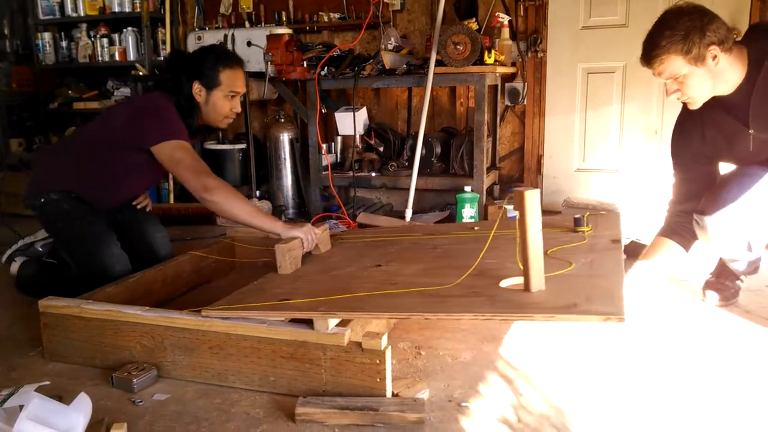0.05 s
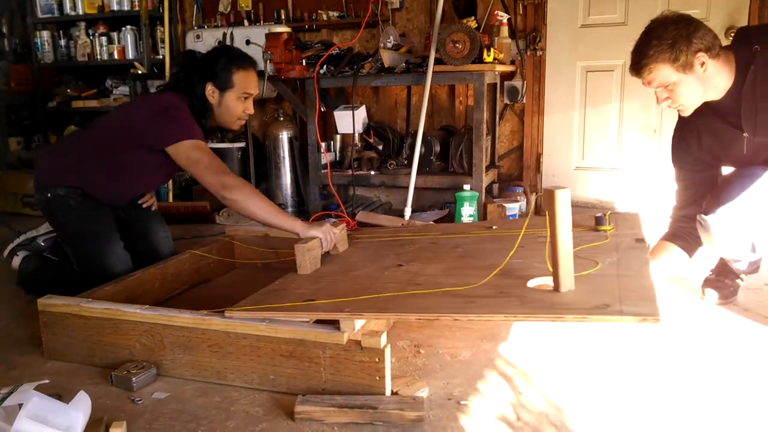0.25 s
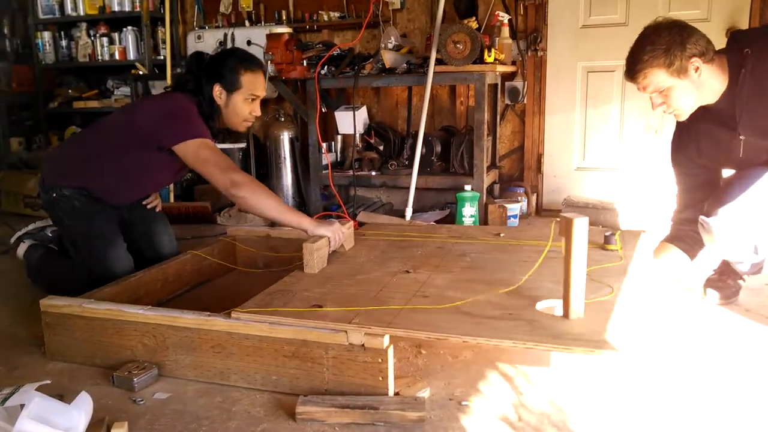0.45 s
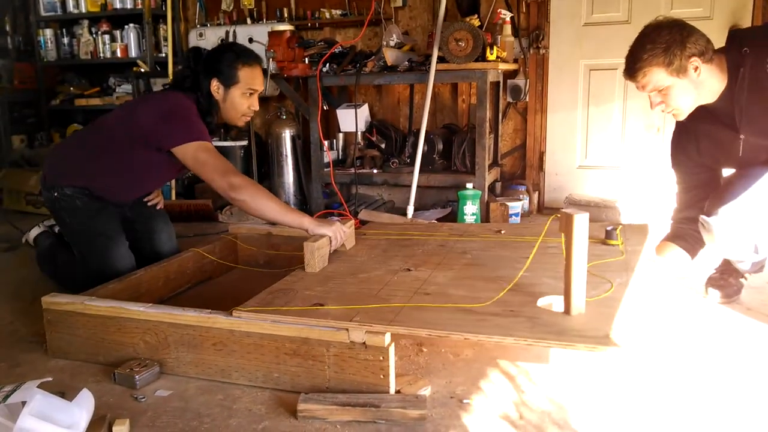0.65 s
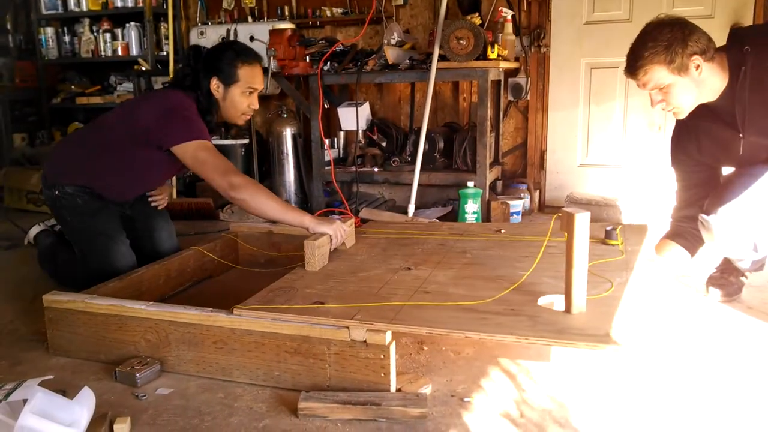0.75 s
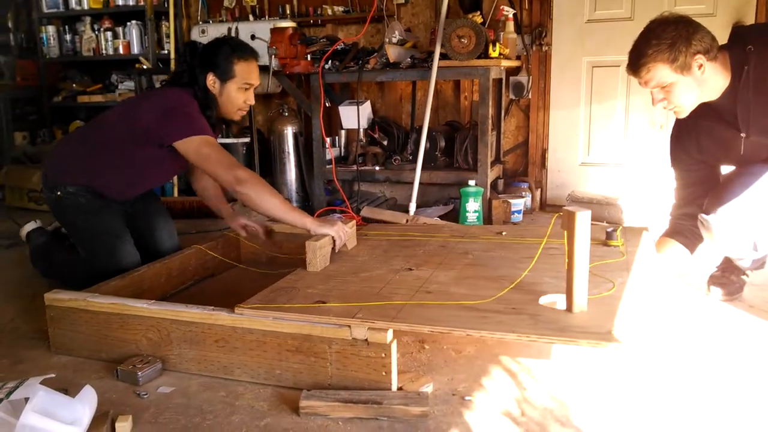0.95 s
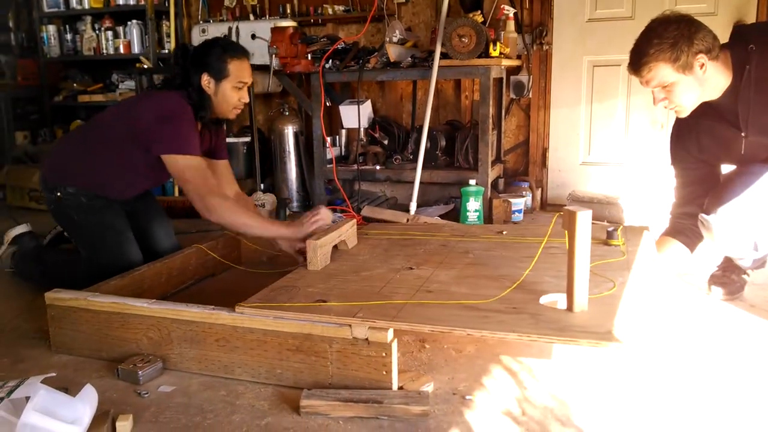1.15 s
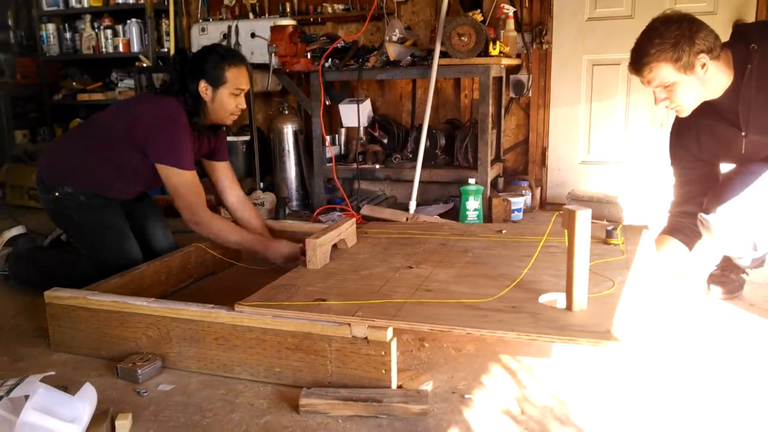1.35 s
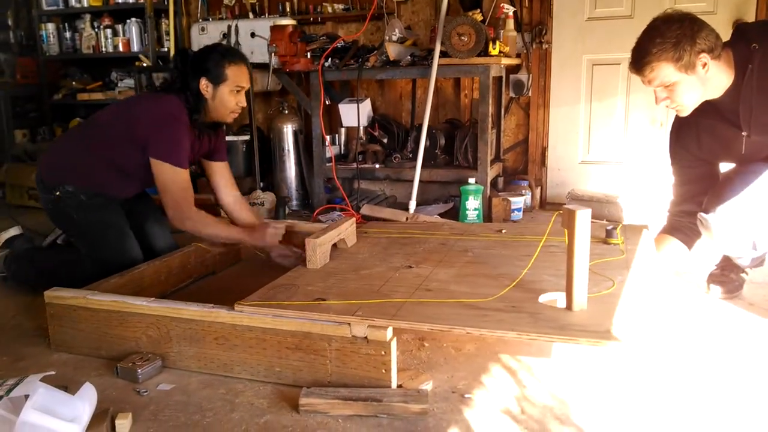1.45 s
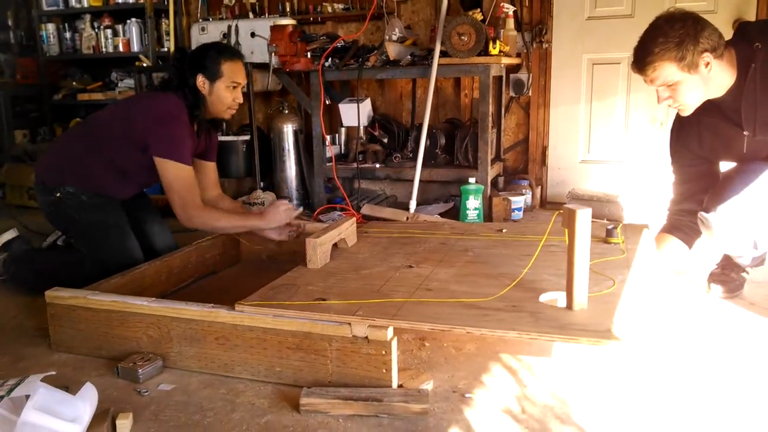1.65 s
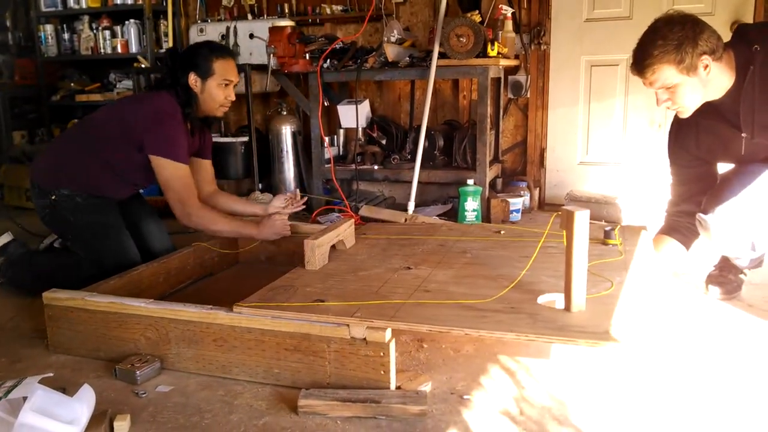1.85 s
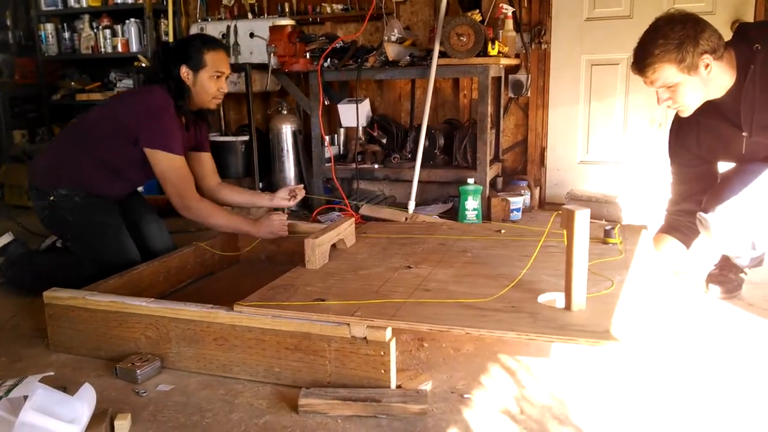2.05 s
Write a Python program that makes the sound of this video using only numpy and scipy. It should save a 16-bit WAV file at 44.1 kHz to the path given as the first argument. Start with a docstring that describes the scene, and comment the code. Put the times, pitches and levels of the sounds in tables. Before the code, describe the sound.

A plywood panel slides over a timber frame with a gritty rub and low stuttering groan until 0.4 s, then clatters down in rapid hollow knocks and sharp cracks to about 0.55 s. Soft scrapes follow; it is knocked home around 0.9 s, ringing briefly. Faint rustles lead to small hard clicks at 1.7-1.8 s and a wooden tap at 2.0 s, over quiet air and faint wavering hum in a short-reverberant garage.

```python
"""Plywood panel onto a timber frame, garage workshop

A plywood panel slides juddering over a timber frame, clatters down onto it and is knocked home.
Then a small hard part clicks in the hand and a wooden piece is tapped down, over air and a wavering hum.
Rubbing is shaped noise, judder a wandering tone, contacts are pulses with noise clusters and ringing modes.
Two microphone ports close together hear it all in a short, cluttered room."""
import sys
import numpy as np
from scipy import signal
from scipy.fft import rfft, irfft
from scipy.io import wavfile
from scipy.ndimage import uniform_filter1d

SR = 44100
rng = np.random.default_rng(int(sys.argv[2]) if len(sys.argv) > 2 else 0)


def wav_record(signal):
    """Record a signal, one row per channel, as 16-bit PCM in the file named by sys.argv[1]."""
    frames = np.transpose(np.atleast_2d(signal))
    bounded = np.clip(frames, -1, 1)
    # unit amplitude maps onto the largest positive 16-bit level
    quanta = np.round(bounded * 32767).astype(np.int16)
    wavfile.write(sys.argv[1], SR, quanta)


N = 92610

# Low background hum. Each row: time in seconds, pitch in Hz, level in dB.
HUM = [(0,113.6,-65),(1.2,116.9,-59),(1.6,115.3,-54.5),(1.7,117.5,-57.5),(1.8,120.5,-48.5),(1.96,122.2,-45.5),(2.1,128,-52.5)]
# Spectrum of the quiet air. Each row: frequency in Hz, relative level in dB.
AIR_SPECTRUM = [(25,-19),(60,4.5),(130,2.5),(250,-4),(500,-14.5),(1200,-21.5),(2500,-26),(3700,-19),(5200,-27.5),(15000,-27)]
AIR_DB = -54.5

# Soft scrapes of the panel, then faint rustles.
# Each row: centre in seconds, length from the peak in seconds, level in dB.
SCRAPES = [(0.684,.025,-48),(.79,0.063,-56),(1.191,0.0276,-51.5),(1.4,0.017,-56.5),(1.59,.05,-61.5)]
# Spectrum of the scrapes and rustles. Each row: frequency in Hz, relative level in dB.
SCRAPE_SPECTRUM = [(150,-1),(350,6.5),(700,1.5),(1500,-0.5),(2500,-4.5),(3700,6.5),(5000,-19.5),(6700,-3.5),(9000,-16),(15000,-18)]
# Taps of the wooden piece. Each row: start in seconds, level in dB.
TAPS = [(2.0211,-24.5),(2.029,-21),(2.043,-34)]
# Spectrum of a tap. Each row: frequency in Hz, relative level in dB.
TAP_SPECTRUM = [(150,-11),(380,-8),(540,0.5),(720,6),(850,-7.5),(1050,-6),(1400,-8),(1750,-7.5),(2400,-12),(3200,0.5),(3750,2.5),(4400,-14),(5500,-16),(10000,-17.5),(15000,-28)]
# Clicks of the small part. Each row: start in seconds, body level in dB, bright edge level in dB.
CLICKS = [(1.693,-40,-56),(1.766,-41.5,-65),(1.776,-43,-52.5),(1.783,-40.5,-24),(1.796,-41.5,-35),(1.811,-32,-28),(1.8122,-26.5,-16.5),(1.823,-34.5,-42)]
# Spectra of the click's body and edge. Each row: frequency in Hz, relative level in dB.
CLICK_BODY_SPECTRUM = [(150,-7),(300,-0.5),(450,-2.5),(700,-8.5),(1200,-1.5),(1900,-2),(2700,-3),(3200,0),(3600,10),(4300,0.5),(6000,-4),(9000,-6)]
CLICK_EDGE_SPECTRUM = [(300,-40),(2500,-13.5),(5500,-10),(7000,1),(8800,-13),(9550,2),(9900,-5),(10400,-2),(11000,-9.5),(11900,0),(13500,-8.5),(15500,-9)]
TAP_T60_S, CLICK_BODY_T60_S, CLICK_EDGE_T60_S = 0.039, 0.045, 0.009

# Effort of the slide. Each row: time in seconds, rub level in dB, grit level in dB before its trim.
SLIDE_EFFORT = [(0,-32,-36),(.1,-37.5,-36.5),(.17,-36.5,-35),(0.218,-32,-40),(.29,-33.5,-37),(.35,-35,-37.5),(0.387,-33.5,-33)]
# Spectra of the rub and the grit. Each row: frequency in Hz, relative level in dB.
RUB_SPECTRUM = [(30,-27.5),(100,-9),(170,-2.5),(320,-3),(620,-5),(830,-13.5),(1000,-8),(1300,-13),(2200,-17),(3500,-31.5)]
GRIT_SPECTRUM = [(1200,-15),(2600,-8),(3100,0.5),(3700,3.5),(4400,-5.5),(5100,-21.5),(6700,-4.5),(8000,-16),(10000,-18),(15500,-33)]
# Single scratches during the slide. Each row: start in seconds, level in dB.
SCRATCHES = [(.031,-41),(0.065,-46.5),(0.156,-41),(0.319,-40),(0.351,-46)]
SLIDE_STOP_S, SCRATCH_T60_S, GRIT_TRIM_DB = 0.41, 0.04, -2
# Uneven grain of the rub, flutter of the grit
GRAIN_SPREAD_DB, CHATTER_DB = 3.5, 3.5
# Wood fibres that catch and snap free during the slide
CATCH_PER_S, CATCH_DB, CATCH_SPREAD_DB = 450, -6, 2

# Stick-slip judder of the panel. Each row: time in seconds, level in dB before its trim.
JUDDER_LEVEL = [(0,-36.5),(.125,-44.5),(.162,-29),(.185,-35.5),(.232,-28),(.255,-41),(.29,-22.5),(.32,-26),(.355,-23.5),(.385,-61)]
# Short low tones after the slide: groans of the settling panel, and at 1.018 s the low ring after a blow.
# Each row: centre in seconds, length from the peak in seconds, pitch in Hz, level in dB.
LOW_TONES = [(0.47,0.019,214,-16.5),(0.636,0.074,219,-38),(0.898,0.019,226,-21.5),(1.018,0.038,184,-29.5)]
JUDDER_HZ, JUDDER_WANDER, JUDDER_TRIM_DB = 220.8, 0.025, 3.5  # wander as a share of the pitch

# Blows of panel on frame. Each row: start in seconds, then levels in dB of the thud,
# the ring of the modes, the knock, the edge crack and the splinter tick.
BLOWS = [(.405,-31,-25.5,-26.5,-9,-21.5),(0.412,-31,-30,-19.5,-15,-21.5),(0.423,-18.5,-15,-10.5,-18.5,-35),
         (.437,-17,-27,-14,-24.5,-74),(0.444,-18,-16.5,-14,-42,-50.5),(0.463,-24,-41,-33,-14.5,-24),
         (0.467,-21.5,-33.5,-39,-24,-15.5),(0.5038,-30.5,-24.5,-15,-22,-48),(.511,-36,-26.5,-17.5,-19.5,-50),(0.533,-52.5,-45.5,-33,-42,-61),
         (.874,-43,-35.5,-28,-21.5,-32),(.915,-20.5,-18,-13,-8.5,-33),(.924,-24.5,-22,-50,-23,-25),(0.963,-35,-30.5,-22,-46,-43),(.981,-29,-34.5,-31.5,-26,-31.5)]
# Modes of the panel. Each row: frequency in Hz, level in dB, decay by 60 dB in seconds.
PANEL_MODES = [(104,-19.5,0.37),(225.9,-1,0.27),(298,-22,.35),(317.3,-6.5,.42),(400,-31,0.11),(516.8,0,0.26),(603.7,-4,.3),(725,-17,.28),(815,-14.5,.3),(900,-19.5,.22),(998,-10.5,0.17),(1221,-19,0.32),(1352,-13,0.17)]
# Spectra of the parts of a blow. Each row: frequency in Hz, relative level in dB.
THUD_SPECTRUM = [(22,-45),(45,-20),(70,-10),(115,-4),(160,-4),(220,-1.5),(310,2),(500,-13.5),(1500,-55.5)]
KNOCK_SPECTRUM = [(25,-57.5),(120,-13),(280,-6.5),(420,-0.5),(550,1.5),(800,-2.5),(1050,-5),(1550,-10.5),(2000,-13),(2700,-20),(5000,-50.5)]
CRACK_SPECTRUM = [(100,-46.5),(1000,-20),(2300,-7),(3100,2),(3800,0),(4600,-17),(6500,-21.5),(10000,-47.5)]
TICK_SPECTRUM = [(300,-43.5),(2500,-6),(5300,-7),(6800,10.5),(8200,-3.5),(10000,-5),(12500,-5.5),(15500,-13)]
THUD_T60_S, KNOCK_T60_S, CRACK_T60_S, TICK_T60_S = 0.11, 0.052, 0.018, 0.017
BEND_DELAY_S = 0.0022  # lag of the thud and knock behind the crack

# Room. Each row: band centre in Hz, decay by 60 dB in seconds, reverberant level in dB.
ROOM_BANDS = [(110,0.22,-3),(302,0.51,3),(712,0.39,-2),(1800,0.33,-4),(4120,0.37,-3),(12000,0.19,2.5)]
ROOM_DELAY_S, ROOM_BUILD_S = 0.0025, 0.0067
# Unrelated part between the ports. Each row: frequency in Hz, level against the common part in dB.
DIFFUSE = [(30,-11.5),(70,4.5),(150,-4.5),(330,-0.5),(600,-9.5),(1400,-9.5),(2500,-7),(4000,1.5),(8000,3.5)]
# Left port against the right. Each row: frequency in Hz, level difference in dB.
PORT_SHADE = [(40,-1),(110,-3.5),(200,2),(380,-4),(1200,-0.2),(2700,-1.5),(3700,-3),(7000,-3.5),(10000,-10),(15000,-4)]
PORT_LAG_S, PORT_LAG_FROM_HZ = 0.0002, 2160
TOP_HZ = 15500

T = np.arange(N) / SR
SIZE = 2 ** 17  # transform length, longer than the scene
FREQS = np.maximum(np.fft.rfftfreq(SIZE, 1 / SR), 1)


def amp(db):
    """Decibels to gain."""
    return 10 ** (np.asarray(db) / 20)


def shape(points):
    """Gain at every frequency from (Hz, dB) points."""
    hz, db = np.array(points, float).T
    return amp(np.interp(np.log(FREQS), np.log(hz), db))


def filtered(x, gain):
    """Apply a frequency response."""
    return irfft(rfft(x, SIZE) * gain, SIZE)[..., :N]


def colour(x, points):
    """Causal (minimum-phase) filter of the given spectrum that keeps the power of white noise."""
    gain = shape(points)
    cepstrum = irfft(np.log(gain / np.sqrt(np.mean(gain ** 2))))
    # folding the cepstrum onto positive time makes the filter causal
    cepstrum[1:SIZE // 2] *= 2
    cepstrum[SIZE // 2 + 1:] = 0
    return filtered(x, np.exp(rfft(cepstrum)))


def noise():
    """White noise of unit power."""
    return rng.standard_normal(N)


def walk(rate):
    """Smooth chance of unit spread; a higher rate in Hz wanders faster."""
    width = int(SR / rate)
    smooth = uniform_filter1d(uniform_filter1d(noise(), width), width)
    return smooth / smooth.std()


def fade(start, t60):
    """Sudden start and exponential decay."""
    return (T >= start) * np.exp(-np.log(1000) * np.maximum(T - start, 0) / t60)


def swells(rows):
    """Smooth rises and falls from (centre s, length s, dB) rows."""
    return sum(amp(db) * np.exp(-((T - at) / length) ** 2) for at, length, db in rows)


def strike(times, dbs, spectrum, t60, sharp):
    """Each contact is a single pulse (the sharp share of its energy) and a cluster of short-lived modes."""
    envelope = np.sqrt(sum((amp(db) * fade(s, t60)) ** 2 for s, db in zip(times, dbs)))
    pulses = np.zeros(N)
    # a pulse carries as much energy as a whole decay
    pulses[(times * SR).astype(int)] = amp(dbs) * np.sqrt(t60 * SR / (2 * np.log(1000)))
    dense = noise()
    # level out the chance swells of the coloured noise
    power = uniform_filter1d(colour(dense, spectrum) ** 2, int(t60 * SR / 4) + 1)
    cluster = envelope * dense / np.sqrt(np.abs(power) + 1e-9)
    return colour(np.sqrt(sharp) * pulses + np.sqrt(1 - sharp) * cluster, spectrum)


def spread(common, unrelated):
    """Sound from all round: a part shared by the ports and a part of opposite sign, weighed by frequency."""
    side = shape(DIFFUSE)
    norm = 1 / np.sqrt(1 + side ** 2)
    return filtered(common, norm) + filtered(unrelated, side * norm) * np.array([[1], [-1]])


def air():
    """Quiet air: steady shaped noise from all round the microphone."""
    return amp(AIR_DB) * spread(colour(noise(), AIR_SPECTRUM), colour(noise(), AIR_SPECTRUM))


def hum():
    """Low hum: one sine whose pitch drifts and whose level wavers."""
    s, hz, db = np.array(HUM).T
    phase = 2 * np.pi * np.cumsum(np.interp(T, s, hz)) / SR
    return np.sin(phase) * amp(np.interp(T, s, db) + 1.5 * walk(20))


def room_tail():
    """Dense reflections that build up and die away band by band."""
    hz, t60, db = np.array(ROOM_BANDS).T
    white, tail = noise(), 0
    for k, weights in enumerate(np.eye(len(hz))):
        band = filtered(white, np.interp(np.log(FREQS), np.log(hz), weights))
        unit_energy = np.sqrt(2 * np.log(1000) / (t60[k] * SR))
        tail = tail + band * fade(0, t60[k]) * amp(db[k]) * unit_energy
    return tail * np.clip((T - ROOM_DELAY_S) / ROOM_BUILD_S, 0, 1)


def scrapes_and_rustles():
    """Soft scrapes of the panel, then faint rustles: soft swells of shaped noise."""
    return colour(noise() * swells(SCRAPES), SCRAPE_SPECTRUM)


def wood_taps():
    """A wooden piece is tapped down: short strikes."""
    return strike(*np.array(TAPS).T, TAP_SPECTRUM, TAP_T60_S, sharp=0.24)


def part_clicks():
    """A small hard part clicks in the hand: a body and a shorter, brighter edge."""
    s, body_db, edge_db = np.array(CLICKS).T
    body = strike(s, body_db, CLICK_BODY_SPECTRUM, CLICK_BODY_T60_S, sharp=0.21)
    edge = strike(s, edge_db, CLICK_EDGE_SPECTRUM, CLICK_EDGE_T60_S, sharp=0.57)
    return body + edge


def moving():
    """Motion of the sliding panel: full, then down to rest within the last 10 ms."""
    return np.clip((SLIDE_STOP_S - T) / 0.01, 0, 1)


def rubbing():
    """Wood fibres catch and let go: a grainy rub, a gritty hiss and single scratches."""
    s, rub_db, grit_db = np.array(SLIDE_EFFORT).T
    grains = noise() * amp(GRAIN_SPREAD_DB * walk(900))
    grains = grains / grains.std()
    snaps = rng.random(N) < CATCH_PER_S / SR
    catches = snaps * amp(CATCH_SPREAD_DB * np.minimum(noise(), 2))
    catches = amp(CATCH_DB) * catches / catches.std()
    rub_level = amp(np.interp(T, s, rub_db))
    rub = colour((grains + catches) * moving() * rub_level, RUB_SPECTRUM)
    grit_level = amp(np.interp(T, s, grit_db) + GRIT_TRIM_DB + CHATTER_DB * walk(400))
    # the grit takes the catches 6 dB weaker than the rub does
    grit = colour((noise() + amp(-6) * catches) * moving() * grit_level, GRIT_SPECTRUM)
    scratches = strike(*np.array(SCRATCHES).T, GRIT_SPECTRUM, SCRATCH_T60_S, sharp=0.0975)
    return rub + grit + scratches


def wandering_tone(hz):
    """A tone of wandering pitch with a weak octave."""
    phase = 2 * np.pi * np.cumsum(hz * (1 + JUDDER_WANDER * walk(46))) / SR
    return np.sin(phase) + amp(-22) * np.sin(2 * phase)


def judder():
    """Stick-slip locked to a mode of the sliding panel: a wandering tone that follows the motion."""
    level_db = np.interp(T, *np.array(JUDDER_LEVEL).T) + JUDDER_TRIM_DB + 1.2 * walk(90)
    return wandering_tone(JUDDER_HZ) * moving() * amp(level_db)


def low_tones():
    """Short low tones after the slide: groans of the settling panel and the low ring after a blow."""
    return sum(wandering_tone(hz) * swells([(at, length, db)]) for at, length, hz, db in LOW_TONES)


def blow_contacts():
    """The panel lands: a thud from the frame, a knock, a crack at the edge and a splinter tick."""
    s, thud_db, _, knock_db, crack_db, tick_db = np.array(BLOWS).T
    bent = s + BEND_DELAY_S  # slow bending waves bring the lows after the crack
    thud = strike(bent, thud_db, THUD_SPECTRUM, THUD_T60_S, sharp=0.222)
    knock = strike(bent, knock_db, KNOCK_SPECTRUM, KNOCK_T60_S, sharp=0.12)
    crack = strike(s, crack_db, CRACK_SPECTRUM, CRACK_T60_S, sharp=0.29)
    tick = strike(s, tick_db, TICK_SPECTRUM, TICK_T60_S, sharp=0.27)
    return thud + knock + crack + tick


def panel_ring():
    """Each blow feeds energy to the panel's modes, which ring on and decay with a slightly wandering pitch."""
    s, ring_db = np.array(BLOWS).T[[0, 2]]
    push = np.zeros(N)
    push[(s * SR).astype(int)] = amp(ring_db) ** 2
    push = signal.lfilter([1 / 64] * 64, 1, push)  # the energy enters over 64 samples
    modes = 0
    for hz, db, t60 in PANEL_MODES:
        energy_decay = np.exp(-2 * np.log(1000) / (t60 * SR))
        energy = signal.lfilter([1], [1, -energy_decay], push)
        phase = 2 * np.pi * np.cumsum(hz * (1 + 0.012 * walk(40))) / SR
        modes = modes + amp(db) * np.sqrt(energy) * np.sin(phase)
    return modes


def ports(x):
    """The treble is later in the left channel, which is mostly weaker; the bass is kept in step."""
    lag = PORT_LAG_S / (1 + (PORT_LAG_FROM_HZ / FREQS) ** 20)
    half_shade = np.sqrt(shape(PORT_SHADE))  # half of the dB difference falls to each port
    left = filtered(x[0], half_shade * np.exp(-2j * np.pi * FREQS * lag))
    right = filtered(x[1], 1 / half_shade)
    return np.array([left, right])


def scene():
    """Contacts scatter round the room; the broad panel radiates its tones straight to the microphone."""
    contacts = scrapes_and_rustles() + wood_taps() + part_clicks() + rubbing() + blow_contacts()
    tones = judder() + low_tones() + panel_ring()
    common = signal.fftconvolve(contacts, room_tail())[:N]
    unrelated = signal.fftconvolve(contacts, room_tail())[:N]
    room = spread(common, unrelated)
    return ports(contacts + tones + room + hum() + air())


def record(dry):
    """The recorder clips at full scale and cuts the top."""
    top_cut = signal.ellip(8, 0.2, 80, TOP_HZ, fs=SR, output="sos")
    return signal.sosfilt(top_cut, np.clip(dry, -1, 1))


dry = scene()
out = record(dry)
wav_record(out)
```